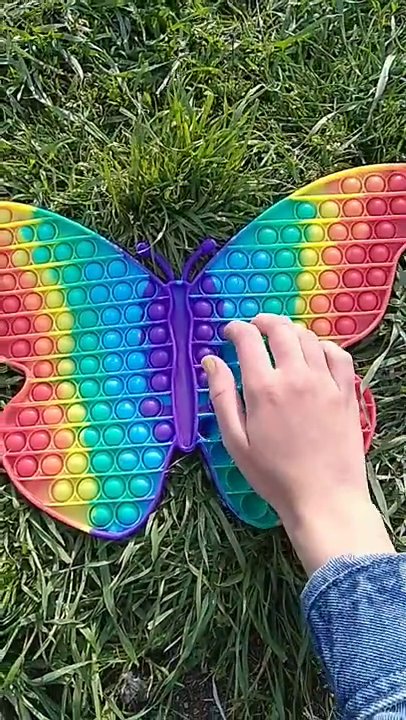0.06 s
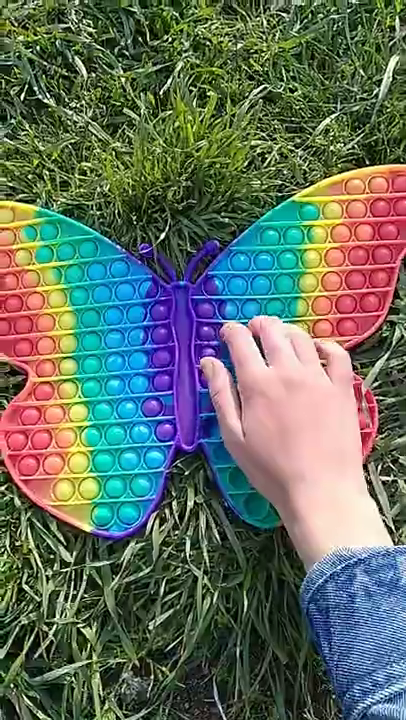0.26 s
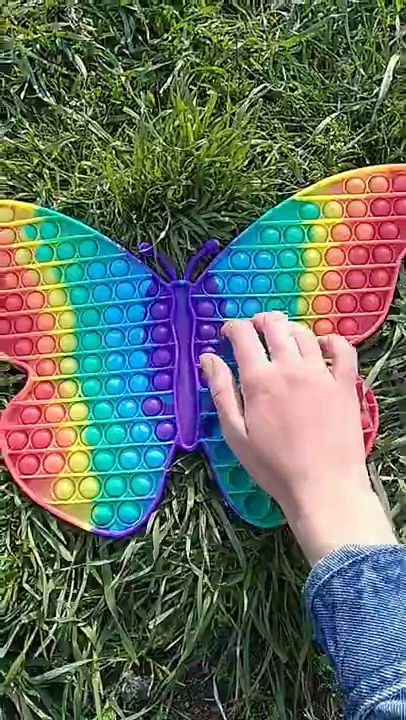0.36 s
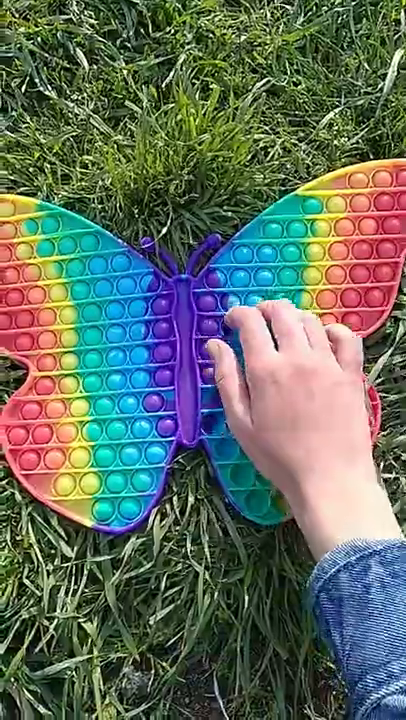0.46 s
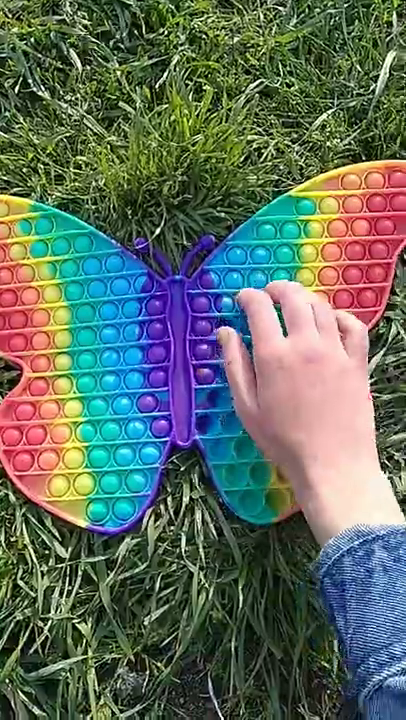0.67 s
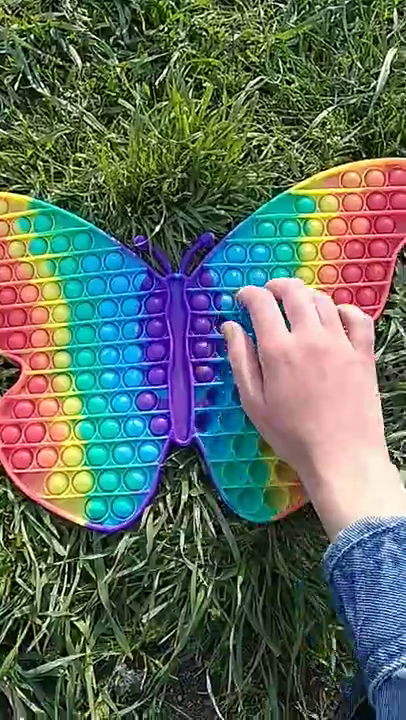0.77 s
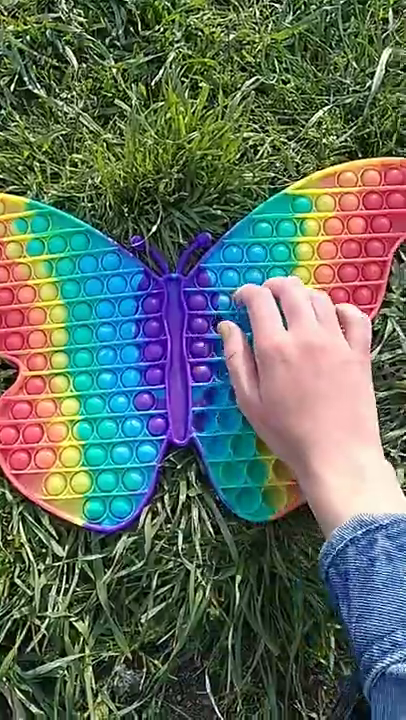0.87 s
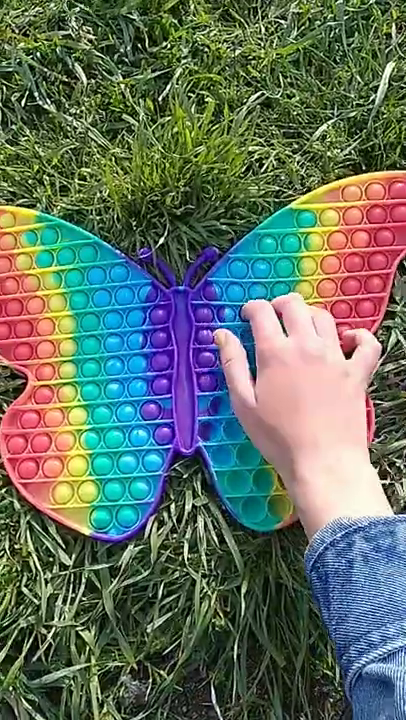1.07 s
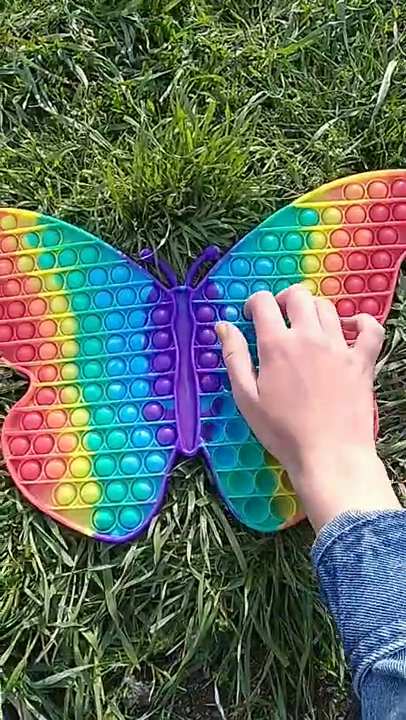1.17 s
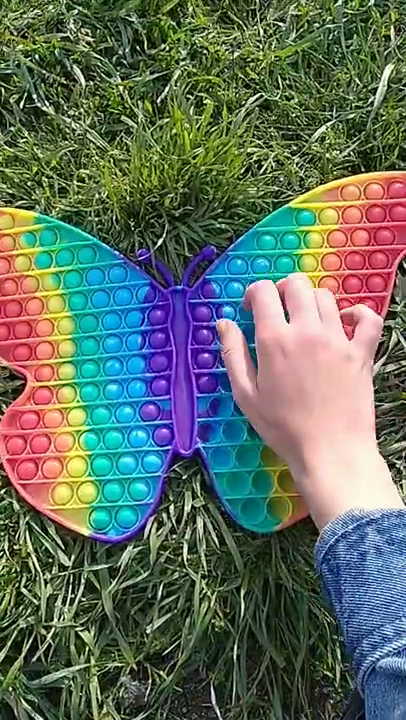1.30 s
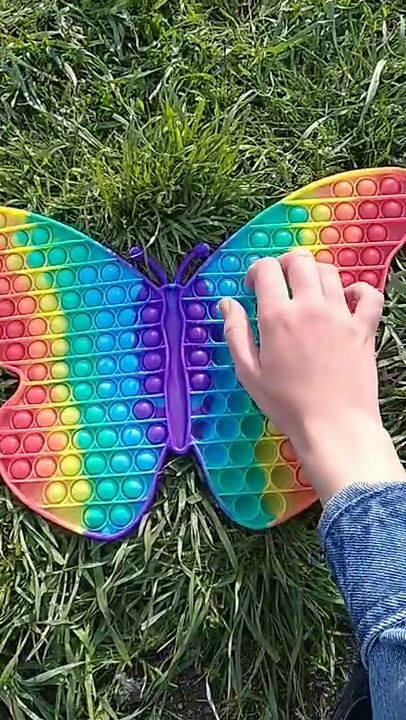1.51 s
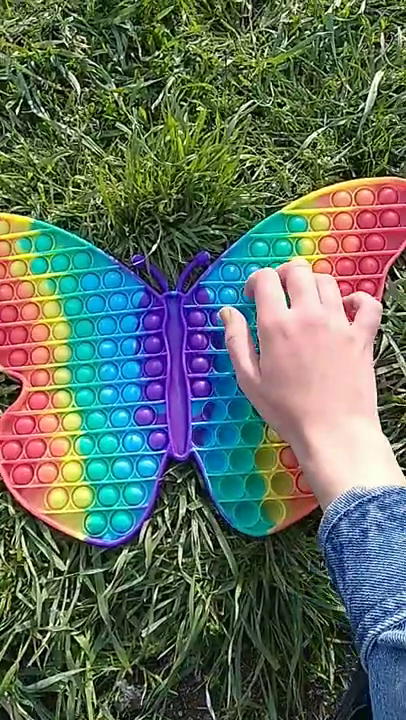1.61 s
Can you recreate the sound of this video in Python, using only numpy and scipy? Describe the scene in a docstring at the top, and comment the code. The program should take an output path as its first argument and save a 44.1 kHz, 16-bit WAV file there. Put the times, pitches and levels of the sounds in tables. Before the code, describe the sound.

Close up on a lawn, a silicone pop toy gives two quick bursts of pops, with a faint far bird between them. Light finger ticks, rubbing and soft bumps against the ground follow, over faint outdoor air.

```python
"""Fingers press a silicone pop toy on a lawn, close up, over faint outdoor air. Skin ticks on the rubber,
then near 0.25 s a quick cluster of domes flips, each with a push of air and a brief ring of its cup.
A far bird calls faintly in the lull. The hand slides, the toy rustles on the grass, and a second
cluster pops just after 1 s. More ticks, slides and soft bumps against the ground end the scene."""
import sys
import numpy as np
from scipy import signal
from scipy.fft import rfft, irfft, next_fast_len
from scipy.io import wavfile
from scipy.ndimage import uniform_filter1d

SR = 44100
rng = np.random.default_rng(int(sys.argv[2]) if len(sys.argv) > 2 else 0)


def unload_wav(signal):
    """Save mono or channel-first audio to the path in sys.argv[1] as 16-bit WAV at rate SR, clipped to [-1, 1]."""
    wavfile.write(
        sys.argv[1],
        SR,
        np.round(np.clip(np.atleast_2d(signal).T, -1, 1) * 32767).astype(np.int16),
    )


N = 72765


def amp(db):
    """Decibels to gain."""
    return 10 ** (np.asarray(db) / 20)


def unit(x):
    """Scale to rms 1."""
    return x / np.sqrt(np.mean(x ** 2) + 1e-20)


def gain(spectrum, hz):
    """Gain at hz from (Hz, dB) points on a log axis."""
    points_hz, db = np.transpose(spectrum)
    return amp(np.interp(np.log(hz + 1), np.log(points_hz + 1), db))


def curves(rows):
    """One value per sample for each column after the time."""
    times_s, *columns = np.transpose(rows)
    return [np.interp(np.arange(N) / SR, times_s, column) for column in columns]


def filtered(x, response):
    """Zero-phase filter with gain response(hz)."""
    size = next_fast_len(N + SR // 2)
    return irfft(rfft(x, size) * response(np.fft.rfftfreq(size, 1 / SR)), size)[:N]


def low_cut(x, hz):
    """Second-order high-pass."""
    return signal.sosfilt(signal.butter(2, hz, "high", fs=SR, output="sos"), x)


def noise(spectrum):
    """Coloured noise of rms 1."""
    return unit(filtered(rng.standard_normal(N), lambda hz: gain(spectrum, hz)))


def patchy(x, depth_db):
    """Random patches of gain over time and frequency."""
    bins = signal.stft(x, nperseg=512)[2]
    field = uniform_filter1d(rng.standard_normal(bins.shape), size=4, axis=0)
    field = uniform_filter1d(field, size=8, axis=1)
    return signal.istft(bins * amp(depth_db * unit(field)), nperseg=512)[1][:N]


def impulse(spectrum, size=1024):
    """Minimum-phase click of peak 1."""
    cepstrum = irfft(np.log(gain(spectrum, np.fft.rfftfreq(size, 1 / SR))))
    cepstrum[1:size // 2] *= 2
    cepstrum[size // 2 + 1:] = 0
    click = irfft(np.exp(rfft(cepstrum)))
    return click / np.abs(click).max()


def since(start_s):
    """Seconds after start_s, zero before it."""
    return np.maximum(np.arange(N) / SR - start_s, 0)


def fade(t, t60_s):
    """Exponential decay from t = 0."""
    return (t > 0) * np.exp(-np.minimum(np.log(1000) * t / t60_s, 50))


def ring(t, hz, t60_s):
    """One damped mode."""
    return np.sin(2 * np.pi * hz * t) * fade(t, t60_s)


def soft_ring(t, hz, t60_s, rise_s):
    """Damped mode with a soft onset."""
    return ring(t, hz, t60_s) * (1 - np.exp(-t / rise_s))


# Air spectrum. Each row: frequency in Hz, level in dB.
AIR_SPECTRUM = [(25, -22.5), (75, -6), (130, -16.5), (400, -34), (700, -20), (1100, -19), (1900, -10.5),
                (3200, -9), (5000, -3.5), (7000, 0.5), (9000, -3.5), (11500, -24.5), (16000, -36.5)]


def outdoor_air(level_db=-60.5):
    """Faint, flickering hiss over a low rumble."""
    return amp(level_db) * unit(patchy(noise(AIR_SPECTRUM), depth_db=4.5))


# Bird notes. Each row: start in seconds, length in seconds, pitch in Hz, width in Hz, level in dB.
BIRD_NOTES = [(0.59, 0.069, 634, 40, -65), (.64, 0.14, 4070, 210, -57.5), (0.734, 0.045, 940, 162, -70),
              (0.775, 0.077, 3940, 210, -58)]


def far_bird():
    """Distant calls, blurred into swells of narrow-band noise."""
    out = np.zeros(N)
    for start_s, length_s, pitch_hz, width_hz, db in BIRD_NOTES:
        band = filtered(rng.standard_normal(N), lambda hz: np.exp(-.5 * ((hz - pitch_hz) / width_hz) ** 2))
        swell = np.sin(np.pi * np.minimum(since(start_s) / length_s, 1))
        out += amp(db) * unit(band) * swell
    return out


# Rustle envelope. Each row: time in seconds, mid level in dB, bass level in dB.
RUSTLE_LEVELS = [(0, -64, -69.5), (.05, -75.5, -90), (.19, -84, -96.5), (.25, -49.5, -73),
                 (.37, -53.5, -61), (.45, -52, -75.5), (.525, -57, -83.5), (.56, -69.5, -107),
                 (.68, -84, -92), (.91, -96, -82.5), (.96, -48, -61.5), (1.04, -50, -50),
                 (1.14, -58.5, -52), (1.24, -59, -73), (1.26, -74.5, -88), (1.385, -96, -100),
                 (1.398, -49, -61), (1.46, -65.5, -62.5), (1.58, -46.5, -64), (1.645, -65, -77)]
# Mid and bass spectra. Each row: frequency in Hz, level in dB.
RUSTLE_MID_SPECTRUM = [(100, -28.5), (300, -14.5), (600, 1.5), (1000, -2.5), (1600, -4), (2600, -17.5),
                       (6000, -27.5)]
RUSTLE_BASS_SPECTRUM = [(20, -24.5), (70, -11), (120, -14.5), (200, 1.5), (300, -7.5), (600, -24)]


def grass_rustle():
    """The pressed toy shifts on the grass."""
    mid_db, bass_db = curves(RUSTLE_LEVELS)
    return amp(mid_db) * noise(RUSTLE_MID_SPECTRUM) + amp(bass_db) * noise(RUSTLE_BASS_SPECTRUM)


# Ground thuds. Each row: start in seconds, level in dB.
GROUND_THUDS = [(.50, -53.5), (0.919, -59), (1.385, -55), (1.449, -41.5), (1.621, -43)]


def ground_thuds():
    """The toy is pushed against the ground: one low mode."""
    return sum(amp(db) * soft_ring(since(start_s), hz=69, t60_s=.063, rise_s=.009)
               for start_s, db in GROUND_THUDS)


# Slide envelope. Each row: time in seconds, hiss level in dB.
SLIDE_LEVELS = [(0, -63), (.15, -55.5), (.22, -54), (.26, -49.5), (.38, -51), (.50, -45.5), (.535, -51),
                (.58, -60.5), (.74, -57), (.915, -61.5), (.95, -38), (.99, -38), (1.03, -42.5),
                (1.10, -47.5), (1.18, -48), (1.238, -45), (1.252, -68.5), (1.292, -78), (1.302, -49.5),
                (1.335, -65), (1.389, -65.5), (1.395, -40), (1.417, -39.5), (1.423, -50), (1.437, -46.5),
                (1.447, -62), (1.453, -39.5), (1.49, -45.5), (1.565, -42), (1.636, -46), (1.645, -67)]
# Hiss and fizz spectra. Each row: frequency in Hz, level in dB.
HISS_SPECTRUM = [(100, -45), (400, -32), (1000, -18), (2500, -8), (4500, -5.5), (6800, -1), (8300, -1),
                 (10000, -10.5), (12500, -26.5), (15500, -25.5)]
FIZZ_SPECTRUM = [(5000, -41), (10000, 1), (15500, -4)]


def skin_slide(catches_per_s=3600, spread_db=5, grain_db=-1, fizz_db=-7, fizz_db_per_db=.95):
    """Skin on silicone: a hiss with tiny catches, brighter as the hand presses harder."""
    level_db, = curves(SLIDE_LEVELS)
    catches = (rng.random(N) < catches_per_s / SR) * rng.choice([-1, 1], N)
    strength = amp(spread_db * np.minimum(rng.exponential(size=N), 4))
    grains = unit(filtered(catches * strength, lambda hz: gain(HISS_SPECTRUM, hz)))
    fizz = amp(fizz_db + fizz_db_per_db * (level_db - level_db.max())) * noise(FIZZ_SPECTRUM)
    hiss = unit(patchy(noise(HISS_SPECTRUM) + amp(grain_db) * grains, depth_db=2))
    return amp(level_db) * (hiss + fizz)


# Sheet bumps. Each row: start in seconds, pitch in Hz, level in dB.
SHEET_BUMPS = [(0.0729, 1320, -34), (.1340, 1360, -34), (.2005, 1500, -43), (.2315, 1383, -14),
               (.2560, 1280, -25), (.2610, 1280, -16.5), (.361, 700, -65), (.5272, 1040, -25.5),
               (1.0700, 1710, -11.5), (1.1075, 1490, -20.5), (1.3950, 604, -29), (1.4290, 814, -23.5),
               (1.4368, 1230, -21.5), (1.5268, 470, -16.5), (1.5378, 990, -39)]
TOY_LOW_CUT_HZ = 215


def sheet_bumps():
    """The sheet gives under a finger without a dome flipping."""
    bumps = sum(amp(db) * soft_ring(since(start_s), hz, t60_s=.004, rise_s=.0008)
                for start_s, hz, db in SHEET_BUMPS)
    return low_cut(bumps, TOY_LOW_CUT_HZ)


# Skin and nail catches. Each row: start in seconds, pitch in Hz, ring level in dB, T60 in seconds,
# splinter level in dB relative to the ring, snap level in dB.
SKIN_TICKS = [(.0739, 7530, -24.5, 0.0033, -10, -46), (0.1344, 7560, -27.5, 0.001, -7, -44),
              (0.1774, 8400, -30.5, 0.002, -16.5, -52), (0.2009, 7300, -34, 0.0026, -10.5, -35),
              (.2331, 7000, -26.5, 0.0025, -14.5, -50), (.2372, 4815, -8.5, 0.0033, -33, -36),
              (.3039, 7700, -28, 0.0054, -15.5, -24.5), (0.3378, 7600, -23, 0.0035, -21.5, -66.5),
              (0.5274, 6750, -37.5, 0.0027, -7.5, -32.5), (0.9279, 7870, -24, .004, -11, -36.5),
              (1.0527, 6500, -33.5, 0.0033, -9.5, -43), (1.0686, 7400, -5.5, 0.0046, -9, -25.5),
              (1.1456, 6000, -25, 0.0015, -19, -39.5), (1.3007, 6600, -33, 0.0045, -14.5, -54.5),
              (1.3957, 7600, -27.5, 0.0028, -12, -25.5), (1.4157, 6650, -28, .003, -12, -43),
              (1.4525, 8250, -26, 0.0035, -8.5, -40), (1.4795, 6800, -25, 0.0028, -11.5, -10),
              (1.5034, 7060, -20.5, 0.0044, -11, -57), (1.5063, 5970, -12.5, 0.0019, -27.5, -13.5),
              (1.5310, 6800, -28.5, 0.0035, -6, -28), (1.5386, 6050, -37, .002, -9, -23)]
# Splinter (bright noise burst) and snap spectra. Each row: frequency in Hz, level in dB.
SPLINTER_SPECTRUM = [(500, -25), (3000, -14), (6000, -5), (8000, 0), (10500, -7.5), (16000, -17)]
SNAP_SPECTRUM = [(40, -33), (150, -4.5), (400, -2), (1700, 4), (2600, 1.5), (4500, -5), (7000, -4),
                 (9000, -19), (16000, -13.5)]


def skin_ticks():
    """Skin lets go of the rubber: a short, bright ring and noise burst over a dull snap."""
    rings, releases = np.zeros(N), np.zeros(N)
    splinter_noise = noise(SPLINTER_SPECTRUM)
    for start_s, hz, ring_db, t60_s, splinter_db, snap_db in SKIN_TICKS:
        start = round(start_s * SR)
        t = since(start / SR)
        splinter = amp(splinter_db) * splinter_noise * fade(t, t60_s=.005)
        rings += amp(ring_db) * (ring(t, hz, t60_s) + splinter)
        releases[start + 1] = amp(snap_db)
    snaps = signal.fftconvolve(releases, impulse(SNAP_SPECTRUM))[:N]
    return low_cut(rings, hz=1400) + low_cut(snaps, hz=90)


def air_push(centre_s, width_s):
    """A brief dip of pressure with a shoulder on either side."""
    u = (np.arange(N) / SR - centre_s) / width_s
    return (u * u - 1) * np.exp(-np.minimum(u * u / 2, 50))


# Dome flips. Each row: time in seconds, cup pitch in Hz, ring level in dB, T60 in seconds,
# air push level in dB, scuff level in dB.
DOME_FLIPS = [(0.2333, 954, -20.5, 0.022, -35, -39.5), (.2377, 780, -6.5, .008, -3, -21),
              (.23883, 510, -7, .009, -4, -35), (.24012, 704, -1.5, .012, -2, -33),
              (0.3298, 770, -3.5, 0.011, -11, -29.5), (0.3438, 672, -4, 0.012, -5.5, -30),
              (1.0263, 740, -11, .012, -21, -37), (1.0307, 715, -17.5, 0.0095, -27, -43),
              (1.0409, 807, -6, 0.011, -8, -27), (1.0449, 699, -5, 0.016, -18.5, -23),
              (1.0610, 678, -17.5, 0.017, -21, -47), (1.0684, 772, -3.5, 0.01, -21, -25)]
# Scuff spectrum, and a bass roll-off that keeps the pops light. Each row: frequency in Hz, gain in dB.
SCUFF_SPECTRUM = [(500, -12), (2500, -8), (3400, -14.5), (4200, -8), (6200, 1.5), (7800, -2), (9500, -17),
                  (16000, -34)]
POP_BASS_ROLLOFF = [(60, -9), (130, -14), (270, -1.5), (1000, 0)]


def dome_pops(lead_cycles=.5, rim_db=-18):
    """A dome snaps through: a push of air, a brief ring of its cup, a scuff of skin."""
    out, scuff = np.zeros(N), noise(SCUFF_SPECTRUM)
    for flip_s, cup_hz, ring_db, t60_s, push_db, scuff_db in DOME_FLIPS:
        t = since(flip_s - lead_cycles / cup_hz)  # the cup moves before the push
        out += amp(ring_db) * soft_ring(t, cup_hz, t60_s, rise_s=.00075)
        dome = air_push(flip_s, width_s=.00022)
        rim = amp(rim_db) * air_push(flip_s, width_s=.0001)  # the rim folds faster
        out += amp(push_db) * (dome + rim)
        out += amp(scuff_db) * scuff * fade(since(flip_s), t60_s=.012)
    return filtered(low_cut(out, TOY_LOW_CUT_HZ), lambda hz: gain(POP_BASS_ROLLOFF, hz))


def scene():
    """Dry mono mix in the open air."""
    toy = dome_pops() + skin_ticks() + sheet_bumps() + skin_slide() + ground_thuds() + grass_rustle()
    return (toy + outdoor_air() + far_bird())[None]


def record(dry):
    """Band limit at 15.8 kHz."""
    return filtered(dry[0], lambda hz: hz < 15800)[None]


dry = scene()
out = record(dry)
unload_wav(out)
```